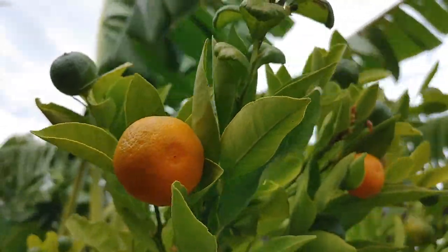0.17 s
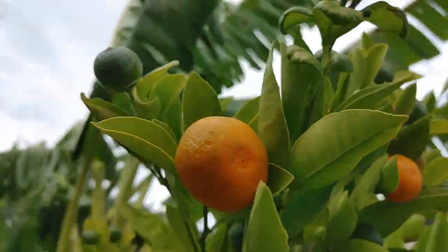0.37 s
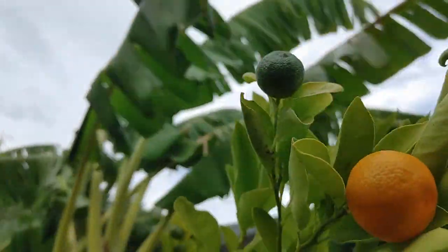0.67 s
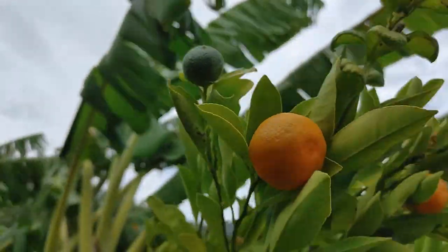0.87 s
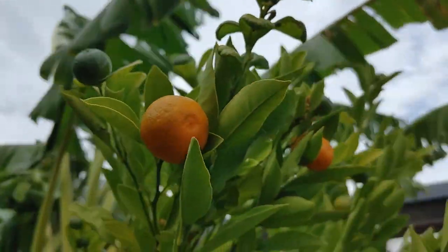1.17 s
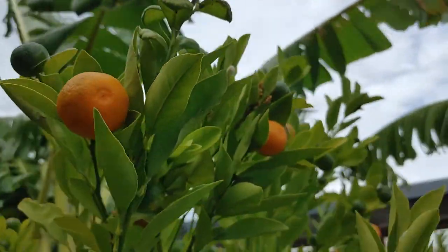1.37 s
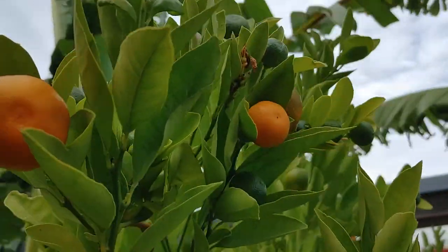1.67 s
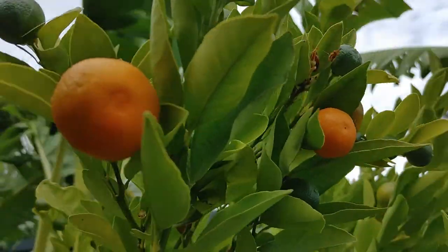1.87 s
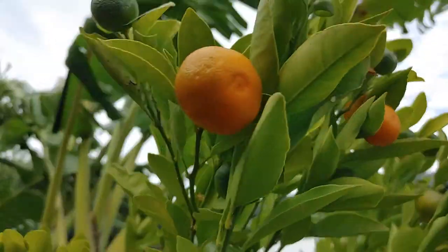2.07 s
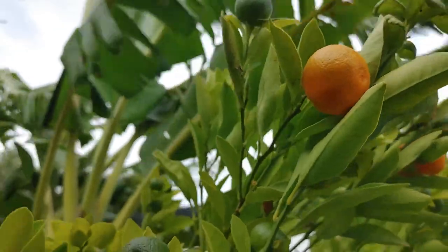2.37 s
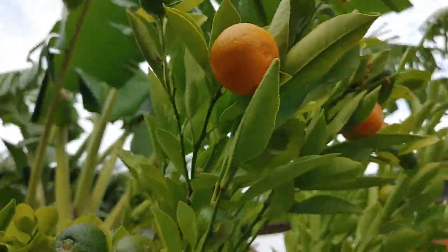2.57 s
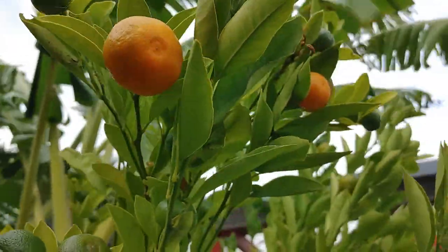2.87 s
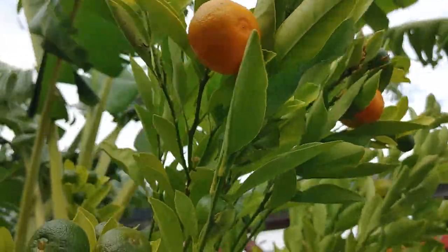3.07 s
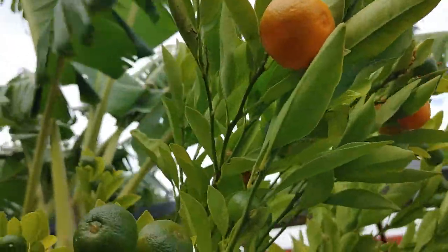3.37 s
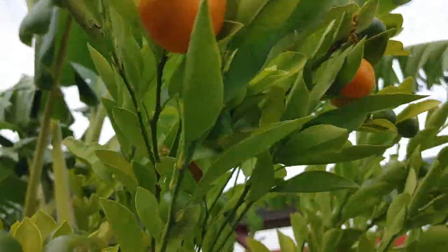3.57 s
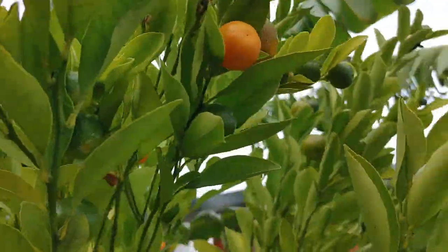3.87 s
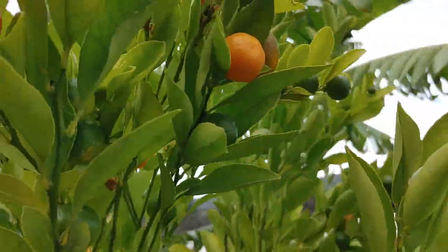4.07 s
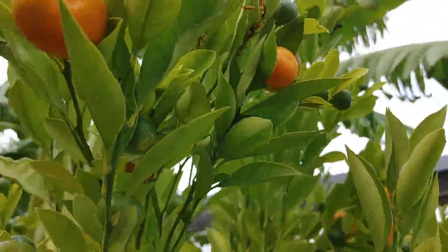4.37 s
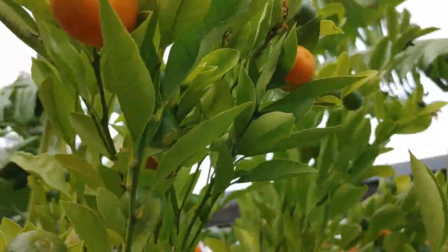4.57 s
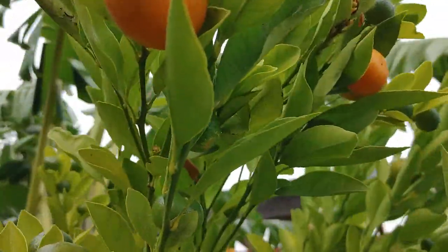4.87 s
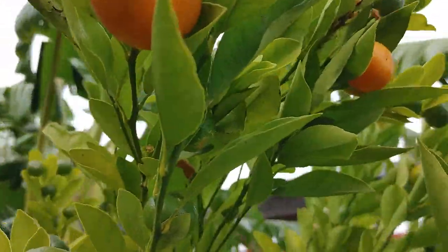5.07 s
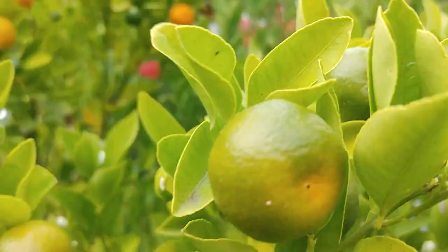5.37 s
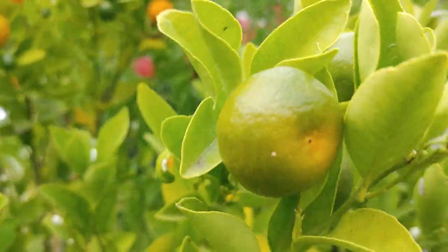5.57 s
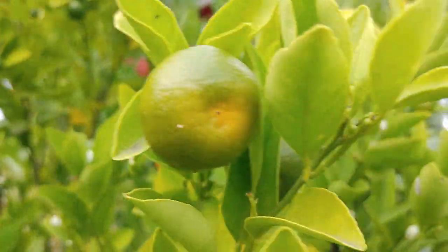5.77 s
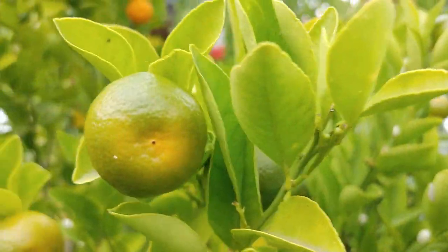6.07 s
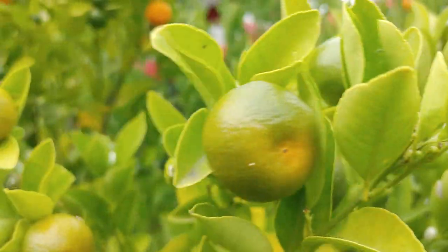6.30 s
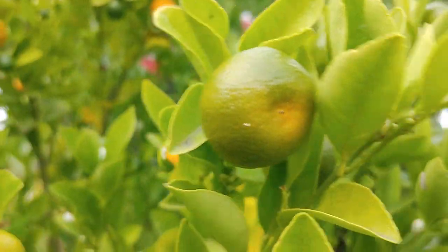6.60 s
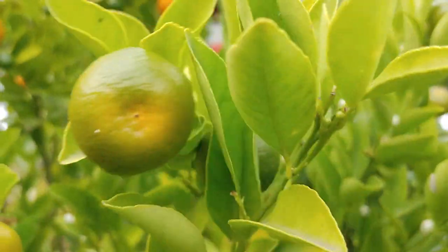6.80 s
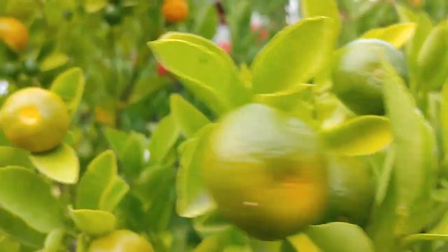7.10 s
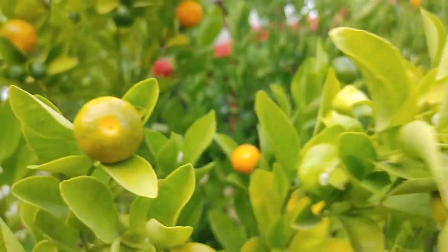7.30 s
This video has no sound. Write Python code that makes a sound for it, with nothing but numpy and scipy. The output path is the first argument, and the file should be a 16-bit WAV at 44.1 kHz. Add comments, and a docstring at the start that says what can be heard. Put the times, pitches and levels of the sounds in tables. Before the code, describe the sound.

Strong wind buffets the microphone in low, rumbling, crackling gusts, then eases to soft leaf rustle with faint far bird calls.

```python
"""A garden of citrus trees, where gusts buffet the two microphone ports of a camera held among them.
Turbulent rumble: faster air sweeps eddies past a port sooner, so it grows brighter as it grows louder.
Hard eddies add crackle and sharp ones snap, both as brief pressure disturbances at one port.
Foliage hisses as filtered, patchy noise, and a few near leaves flick as short bands of noise.
Faint gliding whistles and buzzing honks come from far off, smeared by scatter from the trees."""
import sys
import numpy as np
from scipy import signal
from scipy.fft import rfft, irfft, next_fast_len
from scipy.io import wavfile
from scipy.ndimage import uniform_filter1d, minimum_filter1d, map_coordinates

SR = 44100
rng = np.random.default_rng(int(sys.argv[2]) if len(sys.argv) > 2 else 0)


def waveform_to_disk(signal):
    """Save audio, clipped to [-1, 1], as 16-bit WAV at the path in sys.argv[1]."""
    frames = np.transpose(np.atleast_2d(signal))
    scaled = np.clip(frames, -1, 1) * 32767
    samples = np.round(scaled).astype(np.int16)
    wavfile.write(sys.argv[1], SR, samples)


N = 328104

# Pressure spectrum of the eddies in a full gust: f/Hz, relative level/dB
EDDY_SPECTRUM = [(30, -0.5), (160, 0), (290, -4.5), (480, -14), (750, -32), (1200, -47.5), (2000, -70),
                 (4000, -106)]
# Frequency response of a port: f/Hz, relative gain/dB
PORT_RESPONSE = [(15, -33), (40, -15.5), (80, -5), (130, 0.3), (180, 3.3), (270, 1.8), (370, 1), (425, 0),
                 (452, 6.5), (485, 2.5), (525, -.5), (560, 3.5), (660, -1), (1100, 2)]
# Gusts at a port: port, start of full strength t/s, hold/s, level/dB, swell/s, fade/s
GUST_EVENTS = [("left", .15, .72, -16.7, .19, .38), ("right", .165, .025, -18, .08, .06),
               ("right", .33, .34, -19, .06, .04), ("right", .4, .05, -15, .02, .03),
               ("right", .505, .075, -14, .02, .03), ("right", .755, .085, -14, .025, .04),
               ("right", .92, .1, -23.5, .05, .14), ("right", 1.49, .11, -30, .03, .35),
               ("left", 1.49, .02, -32, .1, .06), ("left", 1.785, .07, -12, .16, .022),
               ("left", 1.965, .08, -11.3, .07, .13), ("right", 1.9, .43, -26.5, .14, .1),
               ("left", 2.165, .135, -8.8, .022, .035), ("right", 2.48, .14, -22, .05, .06),
               ("left", 2.49, .24, -19.5, .12, .2), ("right", 2.76, .06, -20.5, .06, .06),
               ("left", 2.88, .25, -20.3, .06, .2), ("right", 2.94, .04, -15.5, .04, .03),
               ("right", 3.08, .05, -18.5, .025, .04), ("right", 3.2, .09, -16, .04, .04),
               ("right", 3.33, .05, -18, .03, .08), ("left", 3.27, .28, -25.5, .05, .13),
               ("right", 3.43, .13, -33, .05, .04), ("right", 4.82, .06, -44, .12, .05),
               ("left", 5.01, .2, -46, .02, .06), ("left", 5.125, .035, -34, .03, .02),
               ("left", 6.17, .14, -33.5, .028, .12), ("right", 6.31, .42, -41, .1, .14),
               ("right", 6.43, .06, -24.5, .045, .04)]
# Single puffs that brush a port: port, t/s, level/dB
PUFF_EVENTS = [("right", .01, -23), ("left", .22, -12), ("right", .255, -17), ("left", .275, -12),
               ("left", .303, -12), ("left", .495, -12), ("left", .606, -10.5), ("right", .62, -15),
               ("left", .635, -11.5), ("right", .687, -17), ("left", .745, -13), ("left", .85, -9),
               ("right", .897, -17), ("left", .914, -12.5), ("left", 1.01, -17.5), ("left", 1.11, -27),
               ("left", 1.25, -32), ("right", 1.38, -28), ("right", 1.425, -28), ("right", 1.5, -27),
               ("left", 1.61, -25), ("left", 1.665, -23), ("left", 1.852, -12), ("left", 1.89, -23),
               ("left", 1.935, -12.5), ("right", 1.935, -16), ("right", 1.968, -13.5),
               ("left", 2.07, -13.5), ("right", 2.138, -12), ("left", 2.17, -9), ("right", 2.324, -17.5),
               ("left", 2.38, -17.5), ("right", 2.382, -20), ("right", 2.43, -21), ("left", 2.5, -17),
               ("left", 2.59, -16), ("left", 2.72, -15.5), ("right", 2.868, -19), ("right", 3.027, -13),
               ("left", 3.045, -14), ("left", 3.39, -21), ("left", 3.437, -13), ("left", 3.48, -22),
               ("left", 3.52, -17.5), ("left", 3.577, -25), ("left", 3.65, -35), ("right", 3.713, -21),
               ("right", 3.778, -29), ("right", 3.803, -32), ("right", 3.927, -29), ("right", 3.985, -38),
               ("right", 4.235, -45), ("left", 5.01, -36), ("left", 5.123, -27.5), ("left", 5.2, -27),
               ("left", 5.223, -34), ("left", 5.28, -42), ("left", 6.195, -30), ("left", 6.303, -28),
               ("right", 6.335, -28), ("left", 6.495, -23.5), ("right", 6.52, -28), ("right", 6.595, -19),
               ("right", 6.74, -26), ("left", 7.258, -34)]
# Hard eddies that tear at a port: port, t/s, relative strength/dB, length/s
HARD_EDDIES = [("left", .06, -30, .006), ("left", .072, -25, .004), ("left", .097, -30, .007),
               ("left", .148, -32, .005), ("left", .168, -29, .004), ("left", .197, -33, .004),
               ("left", .221, -27, .004), ("left", .304, -14, .004), ("left", .335, -32, .008),
               ("left", .372, -29, .008), ("left", .399, -30, .004), ("left", .432, -27, .007),
               ("left", .497, -22, .007), ("left", .557, -24, .011), ("left", .606, -18, .007),
               ("left", .636, -20, .006), ("left", .744, -29, .008), ("left", .781, -30, .005),
               ("left", .849, -26, .004), ("left", .898, -33, .005), ("right", .258, -32, .005),
               ("right", .36, -31, .012), ("right", .405, -24, .006), ("right", .434, -29, .004),
               ("right", .53, -21, .007), ("right", .559, -25, .005), ("right", .577, -22, .004),
               ("right", .62, -27, .004), ("right", .638, -21, .005), ("right", .819, -19, .005),
               ("left", 1.749, -30, .005), ("left", 1.778, -21, .005), ("left", 1.799, -14, .005),
               ("left", 1.838, -19, .005), ("left", 1.85, -16, .004), ("left", 1.942, -28, .003),
               ("left", 1.967, -28, .004), ("left", 2.003, -22, .004), ("left", 2.042, -23, .004),
               ("left", 2.067, -25, .004), ("right", 2.14, -29, .009), ("left", 2.189, -18, .005),
               ("left", 2.227, -24, .004), ("left", 2.245, -20, .003), ("left", 2.257, -15, .006),
               ("left", 2.287, -23, .004), ("left", 2.301, -24, .004), ("right", 2.33, -34, .009),
               ("left", 2.564, -32, .005), ("right", 2.566, -33, .007), ("right", 2.803, -28, .008),
               ("right", 2.87, -24, .007), ("right", 2.944, -27, .004), ("right", 2.968, -21, .009),
               ("right", 3.026, -24, .006), ("right", 3.114, -34, .005), ("right", 3.201, -30, .006),
               ("right", 3.224, -29, .004), ("right", 3.241, -28, .005), ("right", 3.377, -30, .004),
               ("left", 3.47, -38, .005), ("right", 6.596, -42, .005)]
# Spectrum of the small eddies that a hard one sheds: f/Hz, relative level/dB
CRACKLE_SPECTRUM = [(170, -20), (370, -3), (520, 1.5), (740, -2), (980, -6), (1200, -12), (1420, -19),
                    (1800, -26), (2400, -43), (4000, -80)]
# Sharpest eddies that snap across a port: port, t/s, peak level/dB
SNAP_EVENTS = [("left", .072, -26), ("right", .399, -25), ("right", .528, -17), ("left", .603, -20),
               ("right", .638, -15), ("right", .819, -20), ("left", 1.801, -13), ("left", 1.838, -19),
               ("left", 1.85, -14), ("left", 2.042, -20)]
# Breeze in the garden: t/s, relative near rustle level/dB, relative far tree level/dB
BREEZE_LEVELS = [(0.0, -44, -58.5), (0.3, -45.7, -57), (0.52, -45.5, -55), (0.91, -46, -57),
                 (1.35, -41, -54), (1.84, -43.5, -51), (2.15, -46.5, -54), (2.92, -47.5, -60),
                 (4.14, -50, -62.5), (4.29, -52.5, -65.5), (4.74, -55.5, -67.5), (5.16, -54.5, -66.5),
                 (5.82, -51.5, -67.5), (5.98, -50, -63), (6.18, -44.7, -56), (6.4, -43, -53),
                 (7.21, -43.5, -54.5), (7.44, -41, -52)]
# Rustle shift as the camera turns among the trees: t/s, left-over-right level/dB
RUSTLE_BALANCE = [(0.0, 1.0), (0.85, 2.5), (2.01, 0.5), (2.88, 3.5), (3.15, 1.5), (5.9, 6.0), (6.2, 1.5),
                  (7.44, 2.0)]
# Spectrum of near leaves: f/Hz, relative level per hertz/dB
LEAF_SPECTRUM = [(1000, -11), (2000, -14.5), (2800, -3), (3400, -3.5), (4050, 0.5), (5000, -2.5),
                 (5800, -4.5), (6600, -2), (8300, -2), (9300, -10), (10300, -10), (11600, -5.5),
                 (12300, -12), (12900, -39), (15000, -39)]
# Spectrum of far trees: f/Hz, relative level/dB
FAR_TREE_SPECTRUM = [(60, -52), (200, 2.5), (390, -5), (530, 4), (750, -3.5), (1050, 4.3), (1400, 2.3),
                     (1900, -1.5), (3000, -2), (6000, -20)]
# Spectrum of the distant hum: f/Hz, relative level/dB
DISTANCE_SPECTRUM = [(25, -20), (70, -13), (130, -14), (200, 5), (295, 9), (400, -2.5), (560, 7), (720, 0),
                     (1100, 3), (1800, -10.5), (4000, -28)]
# Flicks of near leaves: t/s, relative level/dB, band centre f/Hz, decay time/s
FLICK_EVENTS = [(1.43, -45, 1095, 0.032), (1.89, -45, 5522, 0.061), (2.902, -46, 5044, 0.02),
                (3.518, -43.5, 5182, 0.011), (4.409, -47.5, 5340, 0.019), (5.097, -53, 3556, 0.032),
                (5.5, -47, 4430, 0.017), (5.548, -54, 2980, 0.031), (6.23, -42.5, 5940, 0.018)]
# Far bird chirps: t/s, length/s, start f/Hz, end f/Hz, direct level/dB
CHIRP_EVENTS = [(1.852, 0.075, 2320, 2480, -44), (2.893, 0.034, 4727, 4934, -44),
                (2.9, 0.058, 5150, 5140, -50), (4.21, .08, 1200, 1140, -57),
                (4.51, 0.118, 3820, 3800, -55.5), (5.23, .11, 955, 945, -58),
                (5.752, 0.055, 4220, 4150, -51)]
# Far honks: t/s, length/s, fundamental f/Hz, resonance f/Hz, relative level/dB, pitch waver as a share
HONK_EVENTS = [(4.02, 0.21, 446, 1900, -60, .014), (6.755, 0.16, 277, 1000, -59.5, .009)]

CALM_DB = -68  # the air that still moves between gusts
EDGE_DB = 20  # drop one swell or fade time away from full strength
FADE_POWER = 1.65  # under 2, a fade leaves a longer tail than a swell has
PUFF_SWELL_S, PUFF_FADE_S = .018, .032
PUFF_DRIVE = .12  # share of a puff's power that speeds up the air
SLOWEST_OCT, FASTEST_OCT = -.9, 1.4  # limits of air speed, in octaves from a full gust
SURGE_OCT = .55  # jump of air speed, in octaves, under the hardest eddy
PORT_TOP_HZ = 1350  # the port muffles the rumble above this
SNAP_S = .00019  # time for the core of an eddy to pass the edge of a port
RUSTLE_DB, FAR_DB = 3, 8.5  # gains on the two breeze levels
ECHO_DB = -2  # scatter from the trees relative to the direct sound
TOP_HZ = 15600  # band limit


def amp(db):
    """Level principle: decibels become an amplitude gain."""
    return 10 ** (np.asarray(db) / 20)


def unit(x):
    """Power normalisation: scale to rms 1."""
    return x / np.sqrt(np.mean(x ** 2) + 1e-20)


def curves(rows):
    """Linear interpolation: one value per sample for each column after the time."""
    s, *cols = np.transpose(rows)
    return [np.interp(np.arange(N) / SR, s, c) for c in cols]


def wobble(rate):
    """Smooth random fluctuation: a spline through rate random knots a second."""
    knots = rng.standard_normal(N // 20)
    return map_coordinates(knots, [np.arange(N) * rate / SR], mode="wrap")


def filtered(x, response):
    """Linear filtering: multiply the spectrum by a response of frequency."""
    n = x.shape[-1]
    padded = next_fast_len(n + 8192)
    spectrum = rfft(x, padded) * response(np.fft.rfftfreq(padded, 1 / SR))
    return irfft(spectrum, padded)[..., :n]


def coloured(x, points):
    """Spectral shaping: levels joined on a log frequency axis, then rms 1."""
    f, db = np.transpose(points)
    return unit(filtered(x, lambda hz: amp(np.interp(np.log(hz + 1), np.log(f), db))))


def patchy_noise(patchy_db):
    """Random modulation: stereo noise with patches of gain in time and frequency."""
    z = signal.stft(rng.standard_normal((2, N)), nperseg=512)[2]
    field = uniform_filter1d(rng.standard_normal(z.shape), size=7, axis=1)  # over frequency
    field = uniform_filter1d(field, size=12, axis=2)  # over time
    return signal.istft(z * amp(patchy_db * unit(field)), nperseg=512)[1][:, :N]


def panned(x, pan_db):
    """Level difference between ears: lean a sound to the left by pan_db."""
    return x * amp(np.reshape([pan_db / 2, -pan_db / 2], (2, -1)))


def add(track, s, sound):
    """Superposition: mix a short sound into the track at time s."""
    part = track[..., round(s * SR):][..., :sound.shape[-1]]
    part += sound[..., :part.shape[-1]]


def at_port(rows, port):
    """Local pressure: select the events that reach one port."""
    return [row[1:] for row in rows if row[0] == port]


def evened(x, first, second):
    """Power equalisation: divide by the running rms, smoothed over two spans in samples."""
    power = uniform_filter1d(uniform_filter1d(x ** 2, size=first), size=second)
    return x / np.sqrt(np.abs(power) + 1e-9)


def buffet(port, full_db, lift_db, puff_db, octave_db=17, flutter_db=3.5, flutter_rate=210, bend=.55):
    """Convected turbulence: the pitch and pressure of eddies past a port both follow the air speed."""
    gust_db, flow_db = wind(port)
    hard = tearing(port)
    surge = SURGE_OCT * np.sqrt(hard / hard.max())
    flutter = flutter_db * wobble(flutter_rate)
    octaves = (flow_db + bend * flutter - full_db) / octave_db + surge
    speed = 2 ** np.clip(octaves, SLOWEST_OCT, FASTEST_OCT)
    # the eddy pattern is read faster in faster air
    eddies = coloured(rng.standard_normal(2 * N), EDDY_SPECTRUM)
    pressure = amp(flutter) * map_coordinates(eddies, [np.cumsum(speed)], mode="wrap")
    pressure = coloured(pressure, PORT_RESPONSE)
    pressure = filtered(pressure, lambda hz: 1 / (1 + (hz / PORT_TOP_HZ) ** 4))
    # weak wind catches the port in separate puffs, strong wind is a steadier roar
    weakness = np.clip((full_db - gust_db) / 20, .4, .7)
    puffs = puff_db * weakness * wobble(45)
    # flutter only bunches the energy; the gust sets its mean and a surge lifts it briefly
    rumble = amp(gust_db + puffs + lift_db * surge) * evened(pressure, 1600, 1000)
    return rumble + crackle(hard, flow_db)


def wind(port):
    """Power addition: gusts and puffs join the calm (dB), but puffs add little to the drive (dB)."""
    gusts = amp(CALM_DB) ** 2
    for s, hold, db, rise, fall in at_port(GUST_EVENTS, port):
        gusts = gusts + (amp(db) * swell(s, hold, rise, fall)) ** 2
    puffs = 0
    for s, db in at_port(PUFF_EVENTS, port):
        puffs = puffs + (amp(db) * swell(s, 0, PUFF_SWELL_S, PUFF_FADE_S)) ** 2
    return 10 * np.log10(gusts + puffs), 10 * np.log10(gusts + PUFF_DRIVE * puffs)


def swell(s, hold, rise, fall):
    """Envelope: a gain that rises until s, holds and trails away."""
    t = np.arange(N) / SR - s
    before = (np.minimum(t, 0) / rise) ** 2
    after = (np.maximum(t - hold, 0) / fall) ** FADE_POWER
    return amp(-EDGE_DB * np.minimum(before + after, 10))


def tearing(port):
    """Intermittent turbulence: each hard eddy at a port has a Gaussian strength in time."""
    out = np.zeros(N)
    t = np.arange(-SR // 25, SR // 25) / SR
    for s, db, length in at_port(HARD_EDDIES, port):
        add(out, s + t[0], amp(db) * np.exp(-(t / length) ** 2))
    return out


def crackle(hard, flow_db, gust_share_db=-25, grows=1.6, rough_db=4.2, hardest_db=-14, dull_oct=.7, trim_db=2):
    """Eddy shedding: crackle under hard eddies, softer throughout strong gusts and duller when weak."""
    strongest_db = flow_db.max()
    steady_db = strongest_db + gust_share_db + grows * (flow_db - strongest_db)
    steady = amp(steady_db + rough_db * wobble(170))
    strength = np.hypot(hard, steady)
    relative = np.minimum(strength / amp(hardest_db), 1)
    speed = 2 ** (dull_oct * (np.sqrt(relative) - 1))
    small_eddies = coloured(rng.standard_normal(N), CRACKLE_SPECTRUM)
    passing = np.interp(np.cumsum(speed), np.arange(N), small_eddies)
    return amp(trim_db) * strength * evened(passing, 260, 200)


def snaps(port):
    """Vortex-core pressure: a sharp eddy pushes and pulls once, in either order, as it crosses the port."""
    out = np.zeros(N)
    t = np.arange(-SR // 200, SR // 200) / SR
    u = t / SNAP_S
    for s, db in at_port(SNAP_EVENTS, port):
        pulse = u * np.exp((1 - u ** 2) / 2)  # peaks at 1
        add(out, s + t[0], rng.choice([-1, 1]) * amp(db) * pulse)
    return out


def foliage():
    """Incoherent summation: leaf contacts merge into hiss; far trees wash dully over a distant hum."""
    rustle_db, far_db = curves(BREEZE_LEVELS)
    pan_db, = curves(RUSTLE_BALANCE)
    # more breeze brings more single contacts out of the hiss, up to 1200 a second
    touching = rng.random((2, N)) < 1200 / SR * amp(rustle_db - rustle_db.max())
    contacts = unit(touching * rng.standard_normal((2, N)))
    hiss = coloured(patchy_noise(patchy_db=2.0) + amp(-6) * contacts, LEAF_SPECTRUM)
    near = panned(hiss * amp(rustle_db + RUSTLE_DB + .7 * wobble(17)), pan_db)
    far = coloured(patchy_noise(patchy_db=2.4), FAR_TREE_SPECTRUM) * amp(far_db + FAR_DB)
    distance = coloured(patchy_noise(patchy_db=3), DISTANCE_SPECTRUM) * amp(-56.0)
    return near + panned(far + distance, pan_db=1.0)


def flicks():
    """Sliding friction: a leaf slips off its neighbour in a short broad-band scratch."""
    out = np.zeros((2, N))
    t = np.arange(SR // 5) / SR
    for s, db, hz, length in FLICK_EVENTS:
        band = lambda f: np.exp(-np.log((f + 1) / hz) ** 2 / 0.39)
        scratch = unit(filtered(rng.standard_normal((2, len(t))), band))
        envelope = (1 - np.exp(-t / 0.00067)) * np.exp(-t / length)
        add(out, s, amp(db + 6) * scratch * envelope)
    return panned(out, pan_db=1.0)


def birds():
    """Frequency modulation: each chirp is a short sine that glides and wavers."""
    song = np.zeros(N)
    waver = 1 + 0.011 * wobble(260)
    for s, length, start_hz, end_hz, db in CHIRP_EVENTS:
        u = np.linspace(0, 1, round(length * SR))
        glide = start_hz + (end_hz - start_hz) * u
        pitch = glide * waver[round(s * SR):][:len(u)]
        whistle = np.sin(2 * np.pi * np.cumsum(pitch) / SR)
        add(song, s, amp(db) * np.sin(np.pi * u) * whistle)
    return song


def honks():
    """Resonance: hoarse buzzes whose fluttering partials are strongest near one frequency."""
    out = np.zeros(N)
    for s, length, pitch_hz, bright_hz, db, waver in HONK_EVENTS:
        t = np.arange(round(length * SR)) / SR
        partials = pitch_hz * np.arange(2, 9)[:, None]  # no fundamental
        noise = rng.standard_normal((len(partials), len(t)))
        flutter = amp(3.5 * uniform_filter1d(noise, size=900) * np.sqrt(900))
        gains = flutter * (0.15 + 1.5 / (1 + ((partials - bright_hz) / 350) ** 2))
        clock = np.cumsum(1 + waver * wobble(118)[:len(t)]) / SR  # wavering time/s
        cycles = partials * clock + rng.random(partials.shape)
        buzz = np.sum(gains * np.sin(2 * np.pi * cycles), axis=0)
        add(out, s, amp(db) * np.sqrt(np.abs(np.sin(np.pi * t / length))) * buzz)
    return out


def through_trees(x):
    """Multiple scattering: trunks and crowns smear a far sound into a decaying tail."""
    t = np.arange(SR // 3) / SR
    scatter = rng.standard_normal((2, len(t))) * np.exp(-t / 0.03)
    scatter = scatter / np.linalg.norm(scatter[0])
    echoes = signal.fftconvolve(x[None], scatter, axes=1)[:, :N]
    return x + amp(ECHO_DB) * echoes


def scene():
    """Superposition: each port has its own turbulence, and the garden reaches both."""
    left = buffet("left", full_db=-12, lift_db=3, puff_db=2.3) + snaps("left")
    right = buffet("right", full_db=-13.4, lift_db=2.5, puff_db=2.5) + snaps("right")
    far_calls = through_trees(birds() + honks())
    return np.array([left, right]) + foliage() + flicks() + far_calls


def record(dry):
    """Peak limiting: duck both channels together at loud peaks, then cut all above the band limit."""
    needed = np.minimum(1, .9 / (np.abs(dry).max(axis=0) + 1e-9))
    gain = uniform_filter1d(minimum_filter1d(needed, size=400), size=400)
    return filtered(dry * gain, lambda hz: hz < TOP_HZ)


dry = scene()
out = record(dry)
waveform_to_disk(out)
```